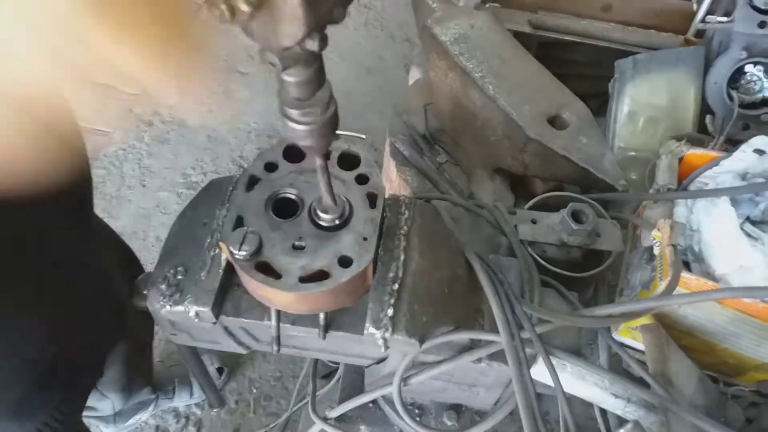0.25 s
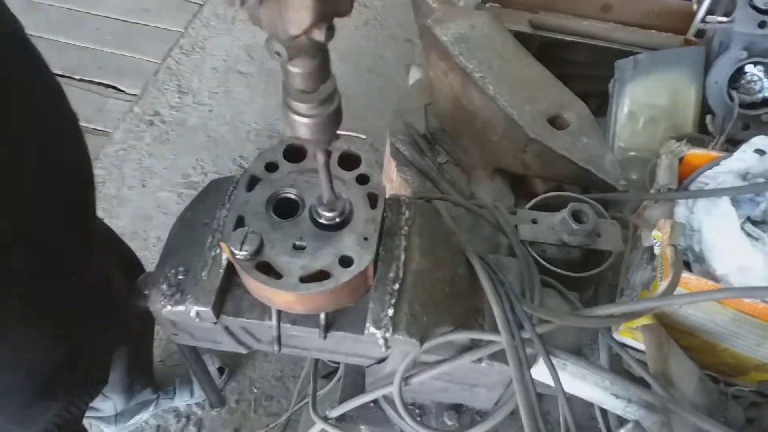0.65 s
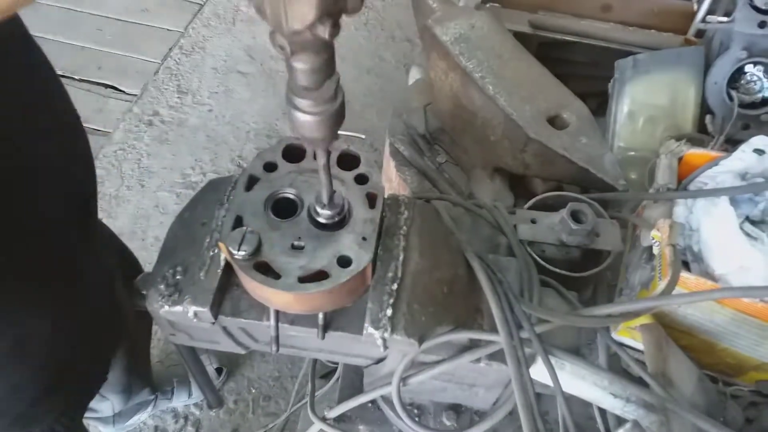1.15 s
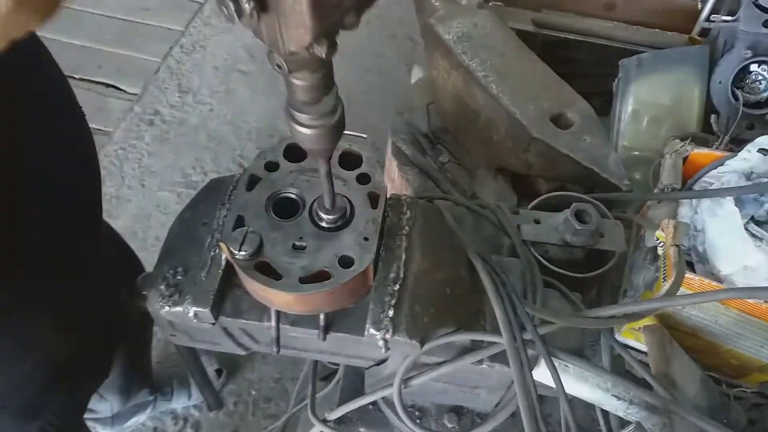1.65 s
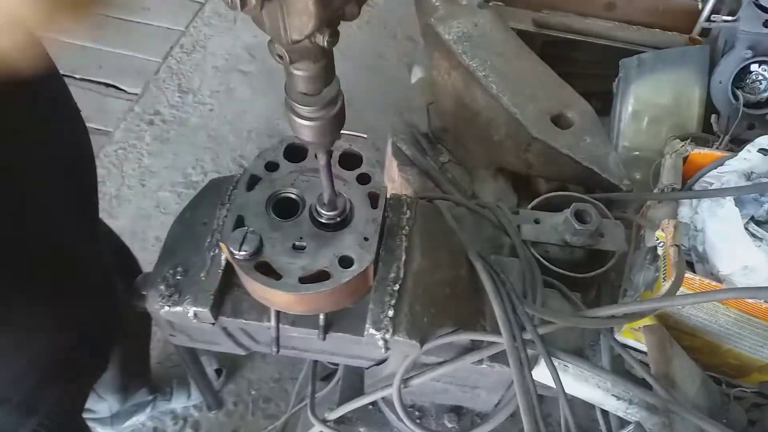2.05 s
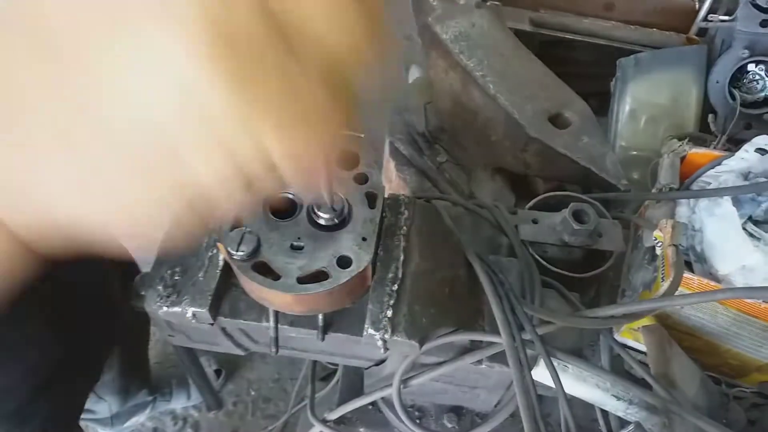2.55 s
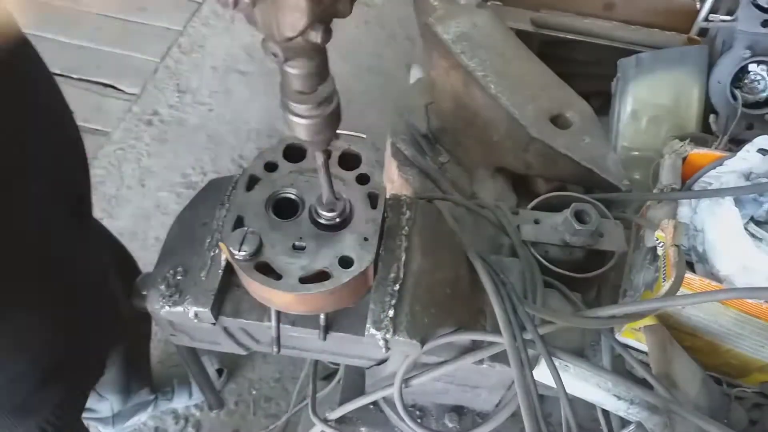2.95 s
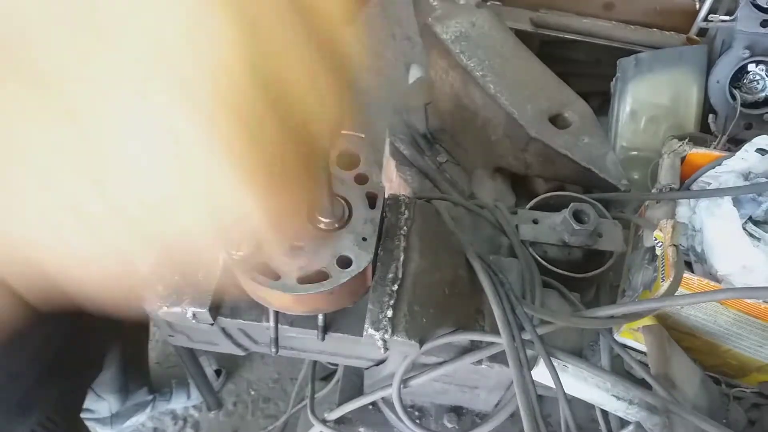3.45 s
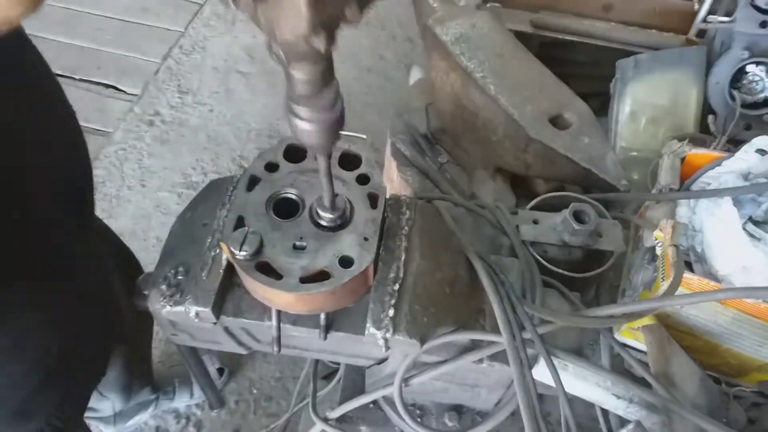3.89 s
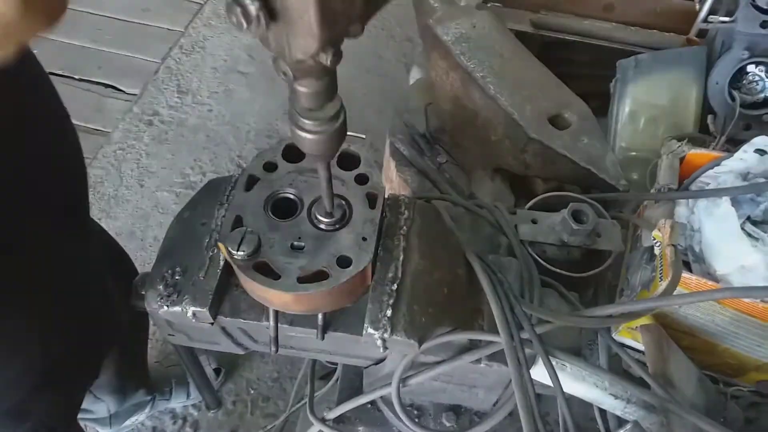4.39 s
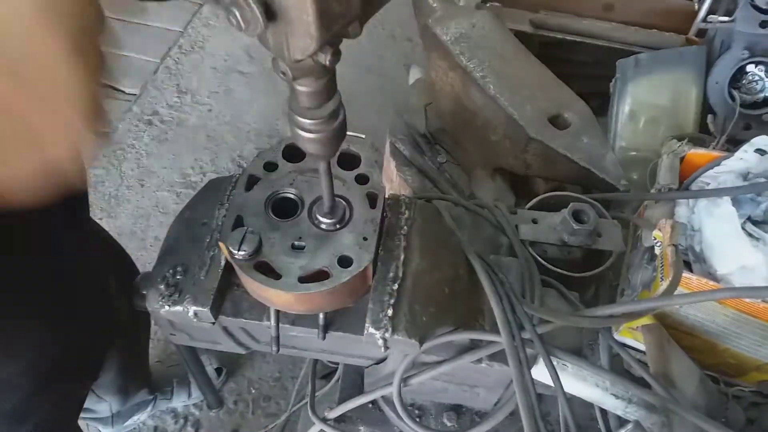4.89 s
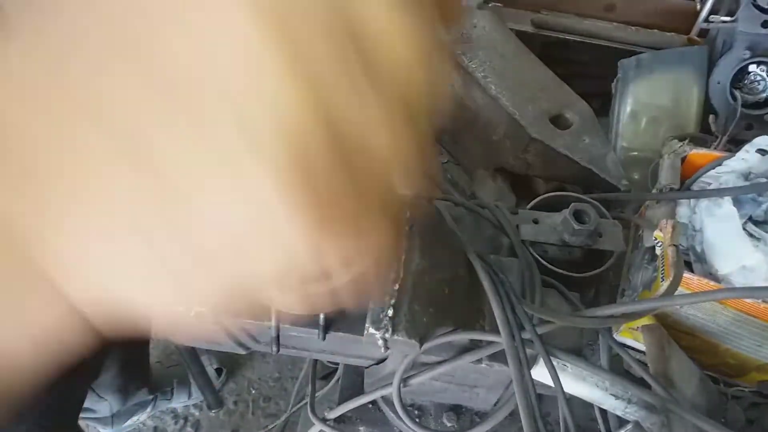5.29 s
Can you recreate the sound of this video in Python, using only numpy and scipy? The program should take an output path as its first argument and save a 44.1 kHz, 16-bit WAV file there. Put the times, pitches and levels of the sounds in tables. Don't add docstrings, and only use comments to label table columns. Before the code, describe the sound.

A valve is ground in its seat by hand drill: crunching landings, raspy gritty grinding, then ticking gears and loose knocks, about twice a second.

```python
import sys
import numpy as np
from scipy import signal
from scipy.io import wavfile
from scipy.ndimage import uniform_filter1d

SR = 44100
rng = np.random.default_rng(int(sys.argv[2]) if len(sys.argv) > 2 else 0)


def how_loud(loudness_db):
    steps = np.asarray(loudness_db, float) / 20
    return 10 ** steps


def dump_mix(stems):
    frames = np.atleast_2d(stems).T
    limited = np.clip(frames, -1, 1)
    pcm = np.round(limited * 32767).astype(np.int16)
    wavfile.write(sys.argv[1], SR, pcm)


N = 243873


def evened(x):
    return x / np.sqrt(np.mean(x ** 2) + 1e-20)


def peaked(x):
    return x / abs(signal.hilbert(x)).max(-1, keepdims=True)


def add(mix, start_s, sound):
    part = mix[round(start_s * SR):][:len(sound)]
    part += sound[:len(part)]


def colour(x, points):
    hz = abs(np.fft.fftfreq(4096, 1 / SR))
    point_hz, point_db = np.transpose(points[:-1])
    db = np.interp(np.log(hz + 1), np.log(point_hz), point_db)
    log_gain = np.log(how_loud(np.maximum(db, -100)))
    taps = np.fft.ifft(np.exp(np.conj(signal.hilbert(log_gain)))).real[:2048]
    return signal.oaconvolve(x, taps)[:len(x)]


def ring(x, modes):
    out = np.zeros(len(x))
    for k, (hz, width_hz, db) in enumerate(modes):
        pole = np.exp((2j * np.pi * hz - np.pi * width_hz) / SR)
        resonance = 2 * signal.lfilter([1 - abs(pole)], [1, -pole], x).real
        out += (-1) ** k * how_loud(db) * resonance
    return out


def turning(force, modes, swell_db, per_s):
    t = np.arange(N) / SR
    knots_s = np.arange(0, N / SR + 1, 1 / per_s)
    out = np.zeros(N)
    for mode in modes:
        swell = how_loud(swell_db * rng.standard_normal(len(knots_s)))
        out += np.interp(t, knots_s, swell) * ring(force, [mode])
    return out


def split(x, hz):
    return [signal.sosfilt(signal.butter(4, hz, kind, fs=SR, output="sos"), x) for kind in ("low", "high")]


def grit(count, per_s, spread_db):
    size = how_loud(spread_db * np.minimum(rng.exponential(size=count), 5))
    size = size * rng.choice([-1., 1.], count)
    return evened(size * (rng.random(count) < per_s / SR))


def shiver(samples, depth_db):
    slow = uniform_filter1d(uniform_filter1d(rng.standard_normal(N), size=samples), size=samples)
    return how_loud(depth_db * evened(slow))


# push_s, rasp_db, grit_hiss_db, stem_db, bench_db
STROKES = [(.03, -26.5, -46, -34.5, -41.5), (.45, -27, -39, -38, -38.5), (.868, -27.5, -38, -37, -38.5),
           (1.36, -32.5, -37.5, -38, -41.5), (1.81, -32, -35.5, -37.5, -40), (2.24, -33, -38.5, -38.5, -41),
           (2.72, -30, -40, -40.5, -40.5), (3.18, -31.5, -39, -40.5, -38.5),
           (3.6, -38.5, -39.5, -40.5, -41), (4.06, -35.5, -41.5, -40.5, -43), (4.5, -38.5, -39, -43, -45.5),
           (4.94, -34, -38.5, -39, -38.5), (5.43, -32.5, -39.5, -39.5, -40)]
# lift_s, release_s, pressure_change_db, shaft_rub_db, shaft_rub_before_next_landing_db
LIFTS = [(0.099, 0.051, -4, -54.5, -59), (0.517, 0.049, -3.5, -52.5, -60.5),
         (1.003, 0.019, -7.5, -50.5, -61), (1.409, 0.072, -0.5, -50, -64), (1.832, 0.15, 1.2, -54, -69),
         (2.275, 0.22, -2.3, -62, -75), (2.842, 0.018, -2, -57, -57.5), (3.282, 0.042, -7, -58, -58.5),
         (3.726, 0.023, -3, -53, -64.5), (4.097, 0.14, 1.5, -58.5, -65), (4.514, 0.17, 4, -54, -73),
         (4.99, 0.18, -2.3, -60, -69), (5.47, 0.19, -2, -57, -56)]
START_DB = (-5.5, -2.5, 2.2, -1.1)
SAG_SHARE = (0.99, 0.18, 0.49, 1.26)
RUB_DB = (-10, -3, 2.2, 3.5)
RUB_END_DB = (-7.5, 4, -14, -3.5)
AFTER_DB = (1.4, .1, 9.8, 13.3)
BIND_DB = (2.2, 3.7, 3.8, .1)


def contact():
    t = np.arange(N) / SR
    lands_s = [-.35] + [row[0] for row in DROPS] + [6.]
    stroke = np.searchsorted(lands_s, t) - 1
    levels = np.zeros((4, N))
    for k, (push, lift) in enumerate(zip(STROKES, LIFTS)):
        push_s, push_db = push[0], np.array(push[1:])
        lift_s, release_s, change_db, rub_db, end_db = lift
        times = [lands_s[k], push_s, lift_s, lift_s + release_s, lands_s[k + 1] - .02]
        times = np.maximum.accumulate(times)
        nodes = [push_db + START_DB,
                 push_db,
                 push_db + change_db * np.array(SAG_SHARE),
                 rub_db + np.array(RUB_DB),
                 end_db + np.array(RUB_END_DB)]
        now = t[stroke == k]
        course = np.array([np.interp(now, times, db) for db in np.transpose(nodes)])
        ringing_on = np.exp(-(now - lands_s[k]) / 0.044)
        levels[:, stroke == k] = course + np.outer(AFTER_DB, ringing_on)
    bind = sum(np.exp(-((t - s - length_s / 2) / 0.017) ** 2) for s, *_, length_s in CATCHES)
    return levels + np.outer(BIND_DB, bind)


# freq_hz, density_db_per_hz
SCRAPE = [(180, -32), (300, -41), (349, -69), (427, -91), (660, -38), (754, -51), (987, -10), (1960, -5.5),
          (3190, -0.5), (5020, -9.5), (6900, -9), (9810, -25.5), (15200, -29), (16500, -72)]
# centre_hz, width_hz, level_db
SEAT = [(2573, 49, 5), (2826, 27, -5.5), (2980, 130, 3), (3140, 40, 0.5), (3350, 58, -1), (3470, 34, 7.5),
        (3700, 27, -6), (3830, 30, -11)]
# centre_hz, width_hz, level_db
HEAD = [(1300, 60, -39), (1780, 19, -12), (4480, 55, -15.5), (4950, 61, -29), (5940, 100, -14),
        (7420, 41, -7.5), (12300, 300, -16), (13000, 250, -16), (10300, 230, -27)]
# centre_hz, width_hz, level_db
FIZZ = [(9200, 1100, -3.5), (10730, 1000, -0.5), (12030, 1050, 1), (13600, 760, -5), (15000, 1100, -1.5)]
# centre_hz, width_hz, level_db
STEM = [(534, 14, -9), (692, 73, -3), (795, 69, -10.5), (922, 44, 3), (956, 23, -8), (986.5, 48, 9),
        (1136, 72, -19)]
# centre_hz, width_hz, level_db
BENCH = [(73.3, 1.8, -4), (129.7, 29.6, -8.5), (167.9, 9.1, 2), (241.7, 16.9, -4.5), (319.5, 7.2, -6.5),
         (344.3, 14, -15)]


def grinding():
    force = grit(N, 11000, 2.76) * shiver(160, 1.67)

    chatter = grit(N, 8000, 0.87) + 0.043 * force
    chatter = chatter * shiver(70, 1.55)
    rasp = turning(chatter, SEAT, swell_db=3.0, per_s=18) + how_loud(-8) * chatter
    rasp = ring(rasp, [(3200, 1100, 0)])

    scrape = colour(force, SCRAPE)
    _, hiss = split(scrape + how_loud(15.5) * turning(scrape, HEAD, swell_db=1.6, per_s=33), 1120)
    hiss, fizz = split(hiss, 9400)
    hiss = hiss + turning(fizz, FIZZ, swell_db=4.0, per_s=14)

    stem = turning(force, STEM, swell_db=2.0, per_s=9)
    layers = [rasp, hiss, stem, ring(force, BENCH)]
    trims_db = [0.0, 6.0, 0.9, 0.36]
    return sum(how_loud(db + trim_db) * evened(x) for db, trim_db, x in zip(contact(), trims_db, layers))


def crunch(length_s, rise_s, t60_s):
    t = np.arange(int(.35 * SR)) / SR
    decay_db = -550 * t - 60 * np.maximum(t - length_s, 0) / t60_s
    shape = np.minimum(t / rise_s, 1) * how_loud(decay_db)
    return shape * grit(len(t), 12000, 3.77)


# start_s, peak_db, stem_db, brightness_db, crunch_length_s
DROPS = [(0.3003, -5, -7.5, -4, 0.012), (0.7422, -9, 2, -3.5, 0.026), (1.2054, -9, 3, -4, 0.0099),
         (1.679, -6, -6, -5, 0.0097), (2.1362, -9, 2, -0.5, 0.017), (2.5932, -11.5, 1.5, -4, 0.0073),
         (3.033, -1.5, -4.5, -6.5, 0.0074), (3.4548, -4.5, -2.5, -2, 0.013), (3.907, -7, -2.5, -6, 0.013),
         (4.3828, -12, -8, -10, 0.012), (4.825, -9, -2.5, -2, 0.013), (5.2869, -10.5, -2.5, -2.5, 0.016)]
# freq_hz, density_db_per_hz
CRUNCH = [(180, -26.5), (300, -8.5), (513, -8), (954, -5), (1270, -10.5), (1840, -7), (4540, -7),
          (5280, -2), (6790, -10.5), (7760, -7.5), (9180, -23), (12800, -18), (15700, -26), (16500, -89)]


def drop(peak_db, stem_db, bright_db, length_s):
    force = crunch(length_s, rise_s=0.0015, t60_s=0.05)
    body, edge = split(colour(force, CRUNCH), 4500)
    dull, body = split(body, 1680)
    body = body + how_loud(-4.5) * dull
    edge = np.pad(edge, (45, 0))[:len(force)]

    knock = np.pad(np.hanning(22), (20, len(force) - 42)) * 2.9
    # centre_hz, width_hz, level_db
    struck_stem = [(918, 20, 4), (670, 50, -9), (985, 32, 0), (490, 50, -12), (950, 150, -9)]
    stem = ring(0.32 * force + knock, struck_stem)

    push = np.hanning(90)
    thud = ring(np.pad(push, (60, len(force) - 60 - len(push))), BENCH)

    parts = peaked(body) + how_loud(bright_db) * peaked(edge) + how_loud(stem_db - 5.5) * peaked(stem)
    return how_loud(peak_db + 5.0) * parts + how_loud(-22.5) * peaked(thud)


# start_s, peak_db, stem_pitch_hz, stem_db, length_s
CATCHES = [
    (1.375, -20.5, 1117, -3.5, 0.04),
    (2.246, -5.5, 1178, -12.5, 0.056),
    (4.951, -6, 1084, -7.5, 0.025),
]


def catch(peak_db, pitch_hz, stem_db, length_s):
    force = crunch(length_s, rise_s=0.0077, t60_s=0.027)
    note = ring(force, [(pitch_hz, 34, 0), (1.012 * pitch_hz, 11, 1),
                        (1.17 * pitch_hz, 50, -8), (.87 * pitch_hz, 40, -8)])
    return how_loud(peak_db) * (peaked(colour(force, SCRAPE)) + how_loud(stem_db) * peaked(note))


# start_s, peak_db, length_s
RUBS = [
    (3.862, -34, .03),
]


def rub(peak_db, length_s):
    count = int(length_s * SR)
    force = np.pad(np.hanning(count) * grit(count, 12000, 1.7), (0, 800))
    band = [(3350, 560, 0)]
    return how_loud(peak_db) * peaked(ring(ring(force, band), band))


# first_tooth_s, last_tooth_s, teeth_count, first_peak_db, last_peak_db
RUNS = [(0.046, 0.197, 10, -25.5, -40), (0.493, 0.5856, 7, -25.5, -36), (0.986, 1.087, 8, -24, -44),
        (1.446, 1.648, 11, -30, -34.5), (1.9046, 2.069, 10, -27.5, -31.5), (2.797, 2.887, 7, -20.5, -26.5),
        (3.2057, 3.325, 8, -30.5, -28.5), (3.628, 3.746, 9, -37, -26), (4.171, 4.345, 10, -31, -34.5),
        (4.602, 4.7716, 10, -26.5, -36), (5.473, 5.519, 4, -32, -18.5)]


def teeth():
    rows = []
    for first_s, last_s, count, first_db, last_db in RUNS:
        u = np.linspace(0, 1, count)
        size, patch, low = rng.random((3, count))
        start_s = first_s + (last_s - first_s) * (u + .06 * u * (u - 1))
        peak_db = first_db + (last_db - first_db) * u + 2.5 * (2 * size - 1)
        centre_hz = 3930 * 2 ** patch
        low_db = -4.5 - 8.5 * u + 5 * (2 * low - 1)
        rows += zip(start_s, peak_db, centre_hz, low_db)
    return rows


# start_s,
# peak_db, centre_hz, low_part_db
KNOCKS = [(.2268, -36, 3470, 4), (.556, -25.5, 3520, -17), (.6245, -37, 5030, -20),
          (.6558, -15.5, 3370, -7.5), (.7163, -24.5, 4410, -18), (1.0294, -28, 8000, -25),
          (1.1015, -23, 4300, -2.5), (1.3543, -18.5, 3630, -20), (1.371, -19.5, 2910, -3.5),
          (1.5263, -24.5, 3000, -3.5), (1.8137, -14.5, 2640, -12), (1.958, -21, 3430, -0.5),
          (4.2505, -24.5, 2820, -11), (2.5022, -39.5, 3520, -24), (2.5429, -22.5, 3680, -9.5),
          (2.5712, -21.5, 2550, -24.5), (1.484, -25, 5960, -16), (2.9456, -29.5, 3470, -4.5),
          (2.9946, -48, 3540, -9), (3.394, -21.5, 3450, -6), (3.8197, -29, 3040, -3),
          (3.8247, -31, 2980, 2.5), (4.0443, -22, 2880, -14), (4.0896, -21.5, 2880, -21),
          (4.1873, -20.5, 5450, -12), (4.2297, -26.5, 4400, -2), (4.6552, -19.5, 4950, -4),
          (4.288, -32.5, 2800, 1.5), (5.251, -11.5, 4950, -6), (5.3338, -31, 3330, -22)]
# start_s, peak_db, centre_hz, low_part_db
SLACK = [
    (0.289, -25.5, 5000, -13),
    (.735, -27, 4500, -12),
    (2.129, -25, 5000, -15),
    (3.017, -25, 6000, -19),
    (4.811, -32, 5560, -7),
]
# start_s, peak_db, centre_hz, low_part_db
COASTING = [(2.2854, -25, 3140, -8), (5.0464, -25.5, 3290, -2.5), (2.3466, -24, 3490, -4),
            (2.36, -21, 5540, -3.5), (2.3768, -25.5, 4070, -8), (2.397, -28, 7650, -24),
            (2.423, -27, 3050, -19), (5.0754, -22.5, 6400, -13), (5.0943, -27.5, 5960, -8),
            (5.1165, -25, 5270, -37), (5.1577, -44.5, 2840, 3), (5.2085, -39, 4000, -27)]
# freq_hz, density_db_per_hz
TOOTH = [(290, -40), (500, -10), (1040, -10), (1680, -1.5), (3930, -2.5), (5040, 2.5), (7940, -4),
         (9740, -27), (13800, -28.5), (16500, -42)]


def ticks(rows, bounce):
    start_s, peak_db, centre_hz, low_db = np.transpose(rows)[:, :, None]
    t = np.arange(2640) / SR
    late, share = rng.random((2, len(rows), 1))

    def snap(t):
        decay = how_loud(-60 * t / 0.016) + 1.8 * how_loud(-60 * t / 0.011)
        return decay * np.clip(t / 0.0003, 0, 1)

    rebound = snap(np.maximum(t - .0025 - 0.0028 * late, 0))
    shape = snap(t) + bounce * share * rebound
    force = rng.standard_normal(shape.shape) * shape
    body, edge = split(colour(force.ravel(), TOOTH).reshape(force.shape), 10200)
    wide = body + how_loud(0.78 * (peak_db + 34)) * edge
    patch = np.array([ring(x, [(hz, 1300, 0)]) for x, hz in zip(wide, centre_hz[:, 0])])
    low, high = split(wide + how_loud(1.5) * patch, 2740)
    sounds = how_loud(peak_db + 2.0) * (peaked(high) + how_loud(low_db + 3) * peaked(low))
    return zip(start_s[:, 0], sounds)


def walls(x):
    taps = np.zeros(SR // 2)
    at = np.arange(200, len(taps) - 20, 20)
    taps[at + rng.integers(0, 20, len(at))] = rng.choice([-1., 1.], len(at))
    t = np.arange(len(taps)) / SR
    low, high = split(taps, 1130)
    tail = low * how_loud(-60 * t / 0.26) + high * how_loud(-60 * t / 0.099)
    return signal.oaconvolve(x, tail / np.linalg.norm(tail))[:N]


# freq_hz, density_db_per_hz
SHOP = [(18, -67), (30, 18), (167, 5.5), (388, 5.5), (979, 1.5), (1310, -8), (5740, -37), (7880, -25),
        (9230, -15), (15200, -7), (16500, -80)]


def workshop():
    return how_loud(-56) * evened(colour(rng.standard_normal(N), SHOP))


def scene():
    steady = grinding() + workshop()
    hits = np.zeros(N)
    for table, source in ((DROPS, drop), (CATCHES, catch), (RUBS, rub)):
        for start_s, *settings in table:
            add(hits, start_s, source(*settings))
    knocking = ticks(KNOCKS + SLACK, bounce=0.43)
    gears = ticks(COASTING + teeth(), bounce=.9)
    for start_s, sound in [*knocking, *gears]:
        add(hits, start_s, sound)
    return (hits + how_loud(-10.5) * walls(hits) + steady)[None]


def top_cut(x):
    return signal.sosfilt(signal.butter(12, 16660, fs=SR, output="sos"), x)


def record(dry):
    thin = signal.sosfilt(signal.butter(4, 60, "high", fs=SR, output="sos"), dry)
    band_limit = signal.firwin(601, 15800, window=("kaiser", 7), fs=SR)
    thin = signal.oaconvolve(thin, band_limit[None], "same")
    mix = 1.375 * np.tanh(thin / 1.677)
    return top_cut(mix)


dry = scene()
out = record(dry)
dump_mix(out)
```